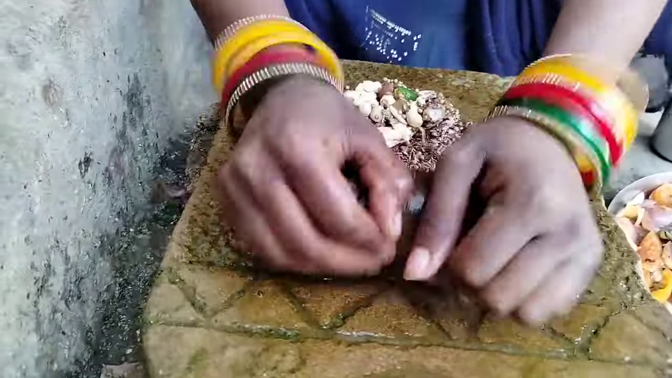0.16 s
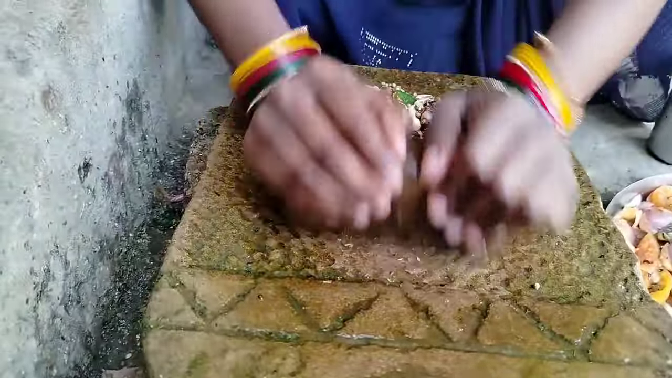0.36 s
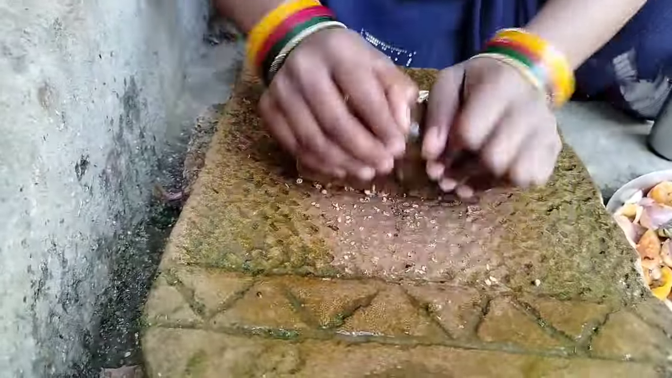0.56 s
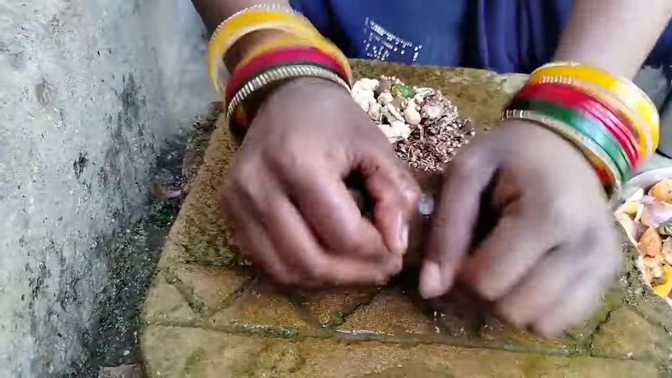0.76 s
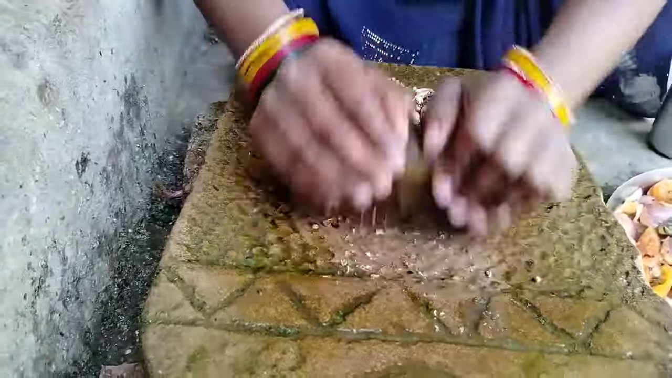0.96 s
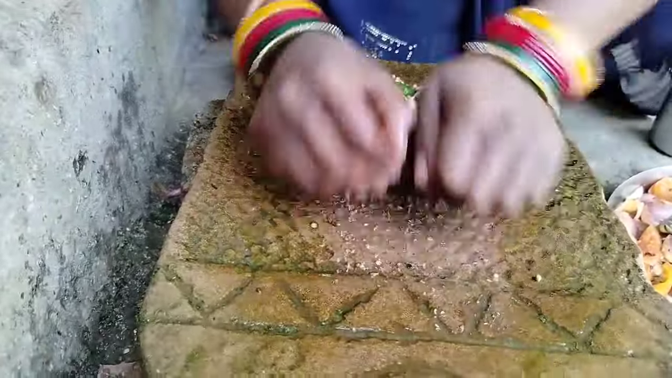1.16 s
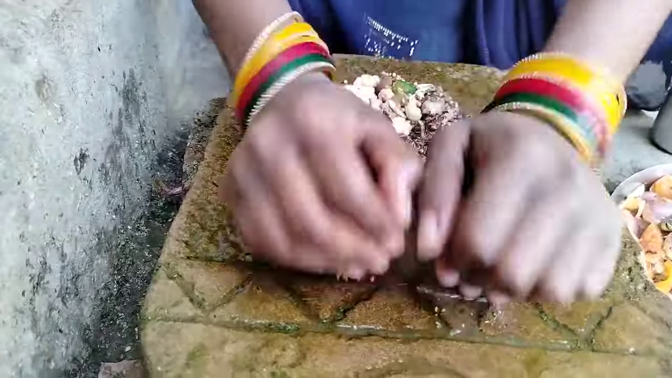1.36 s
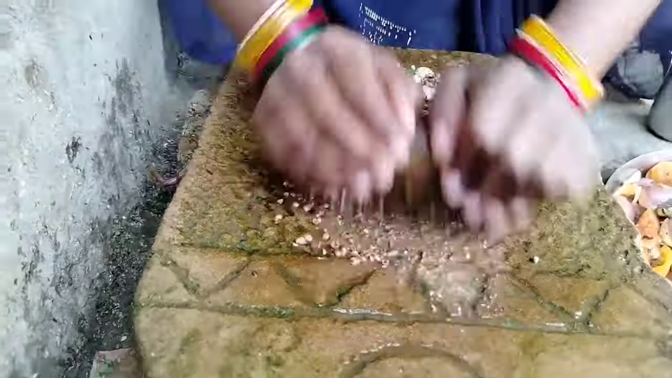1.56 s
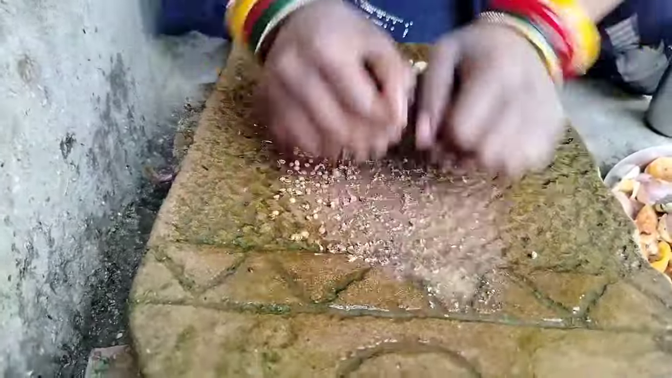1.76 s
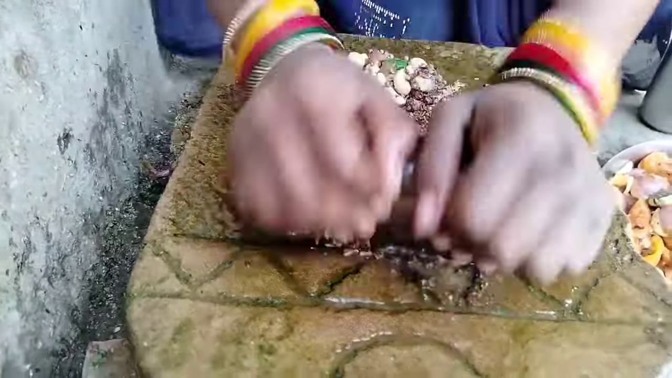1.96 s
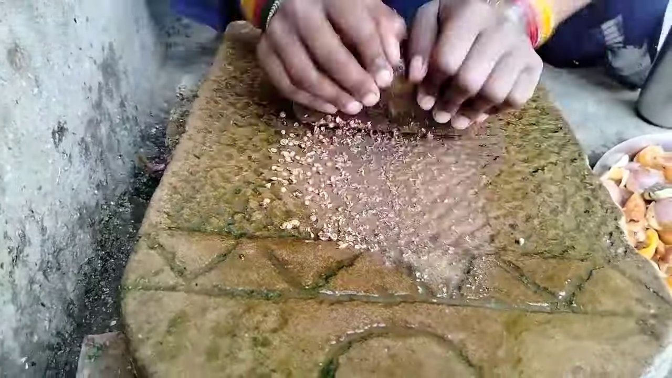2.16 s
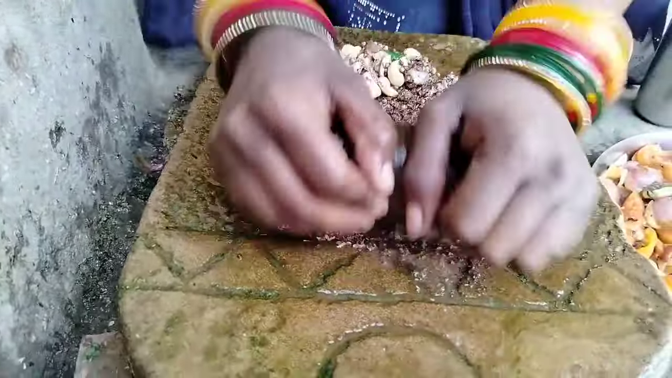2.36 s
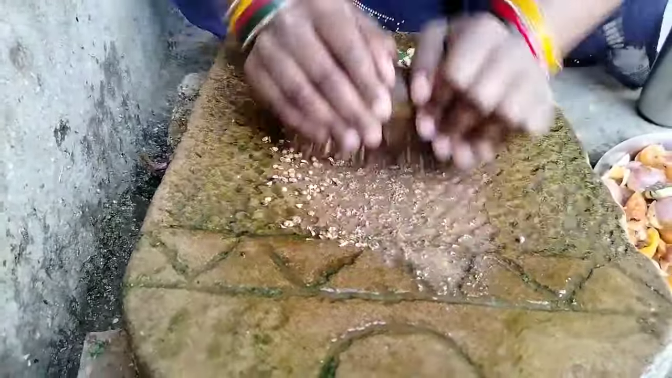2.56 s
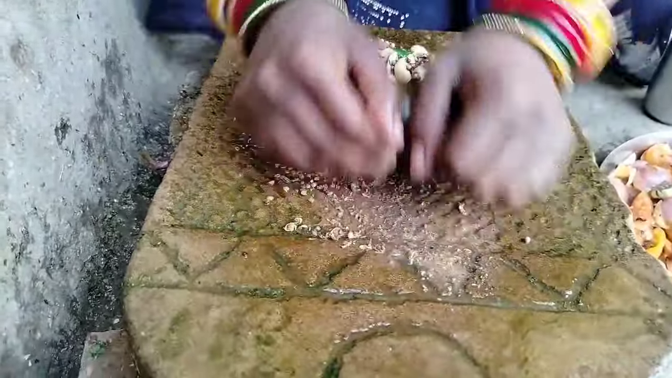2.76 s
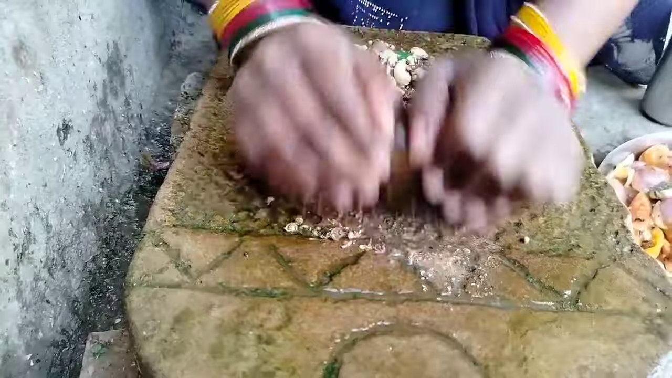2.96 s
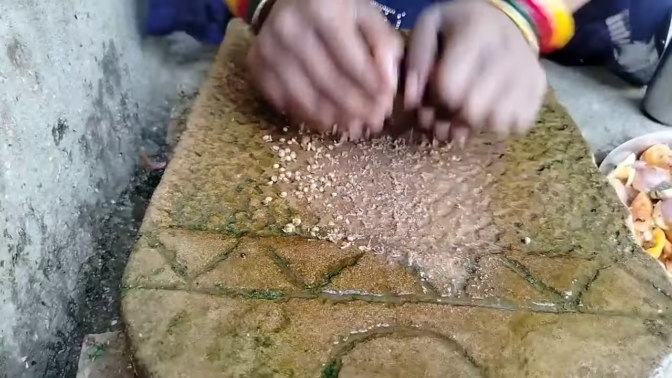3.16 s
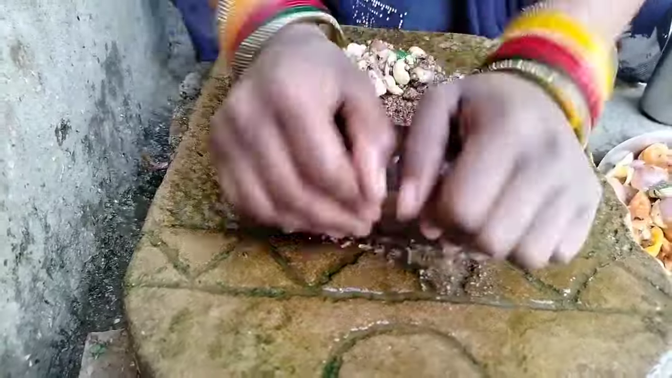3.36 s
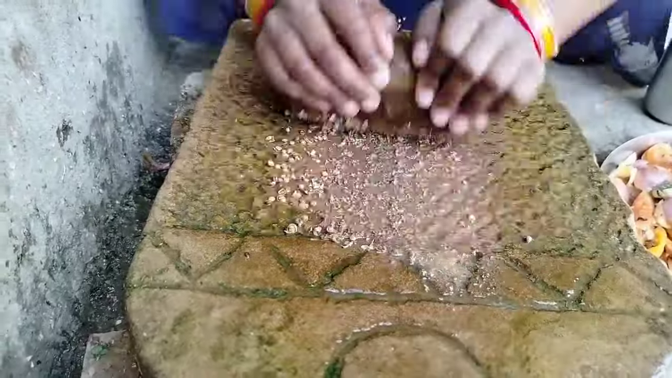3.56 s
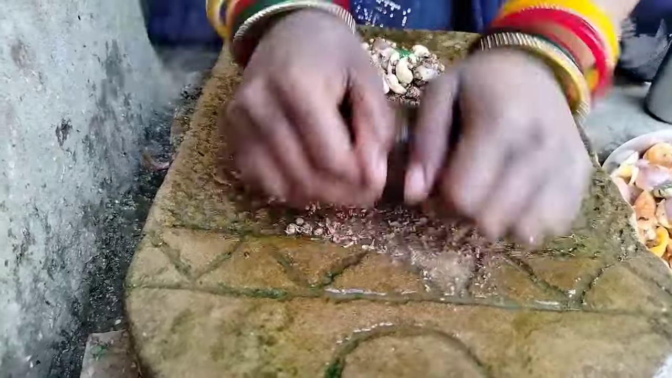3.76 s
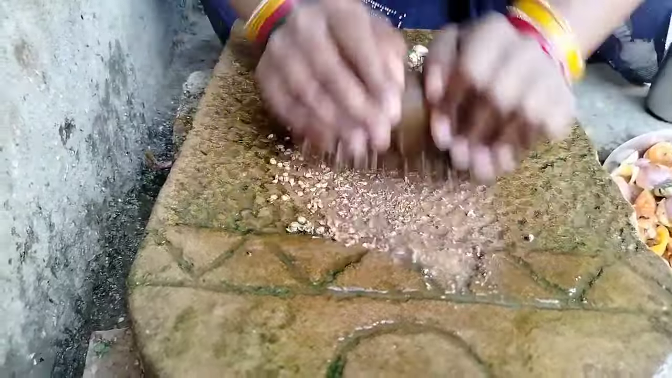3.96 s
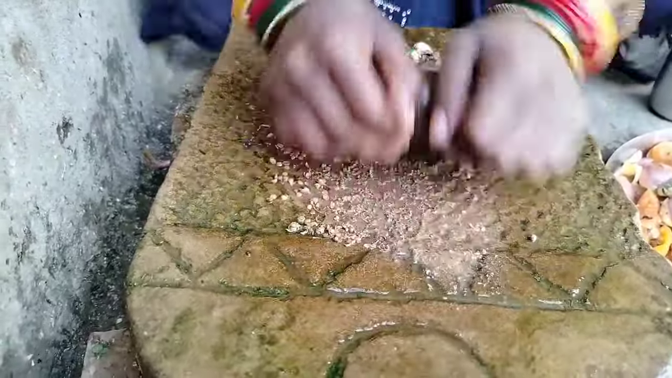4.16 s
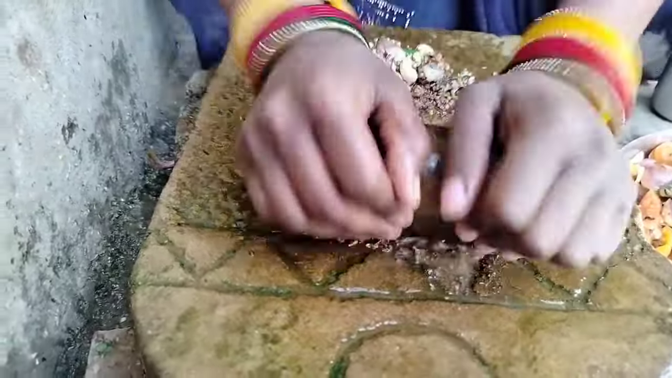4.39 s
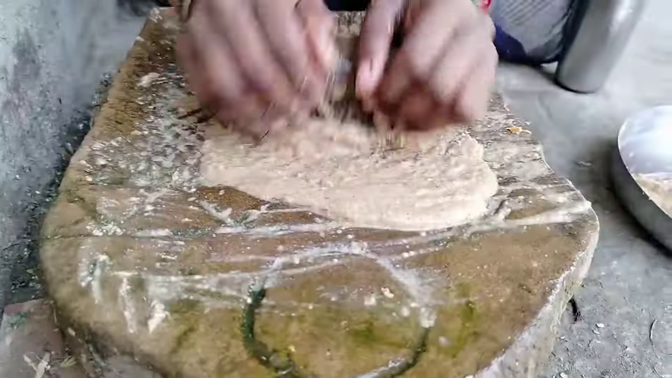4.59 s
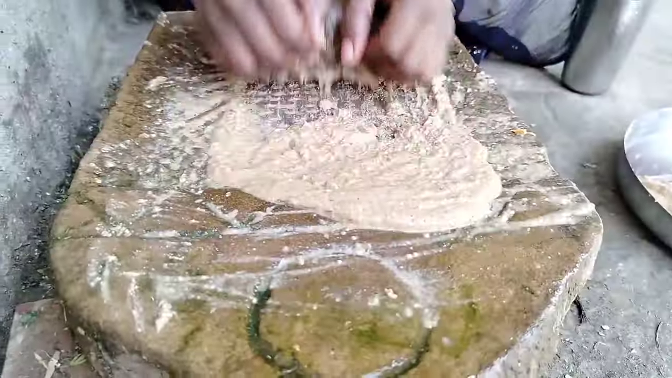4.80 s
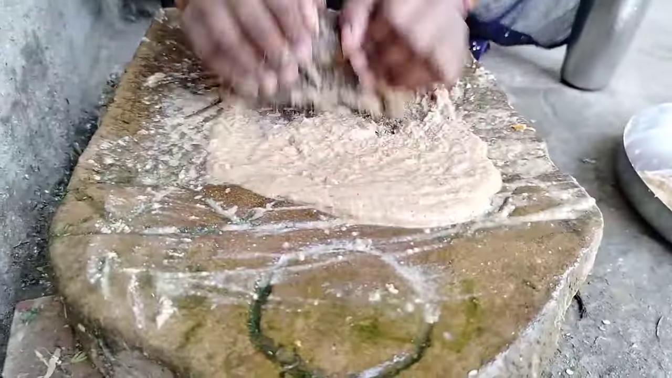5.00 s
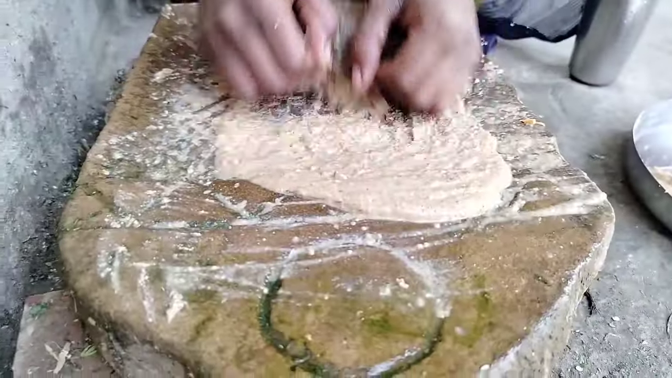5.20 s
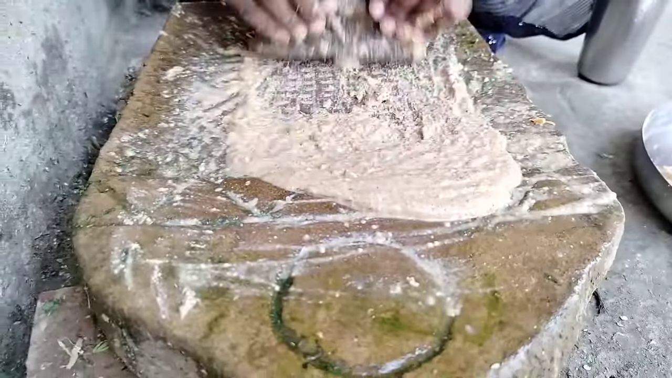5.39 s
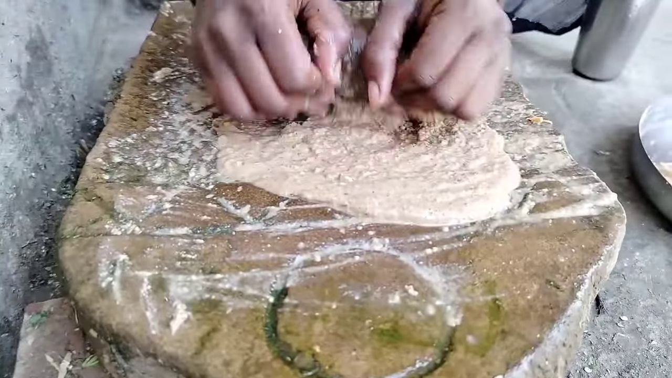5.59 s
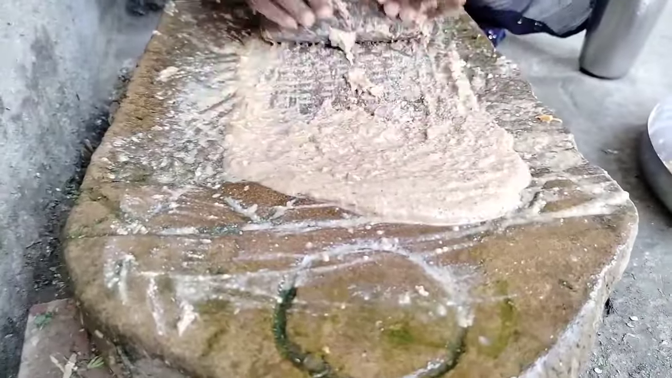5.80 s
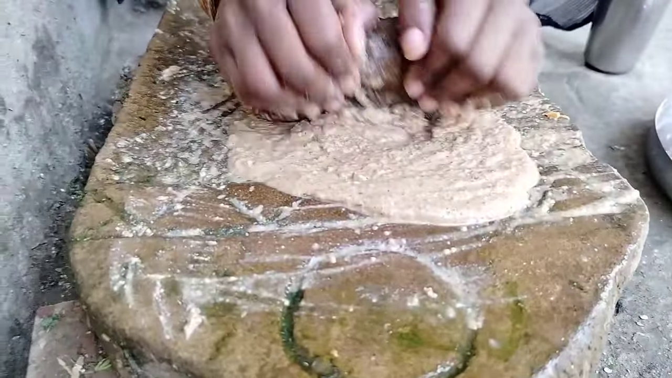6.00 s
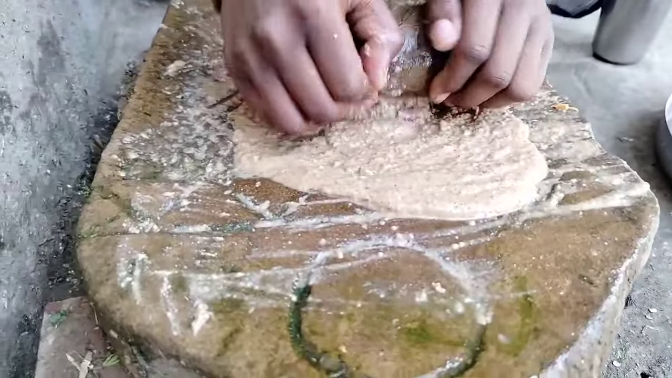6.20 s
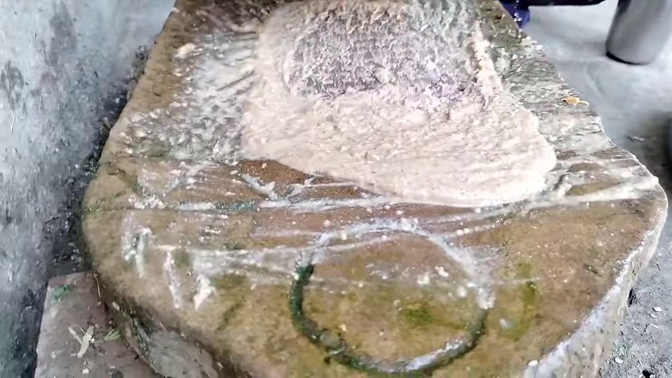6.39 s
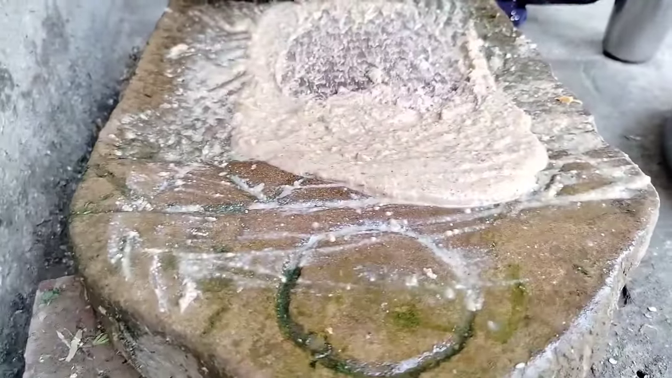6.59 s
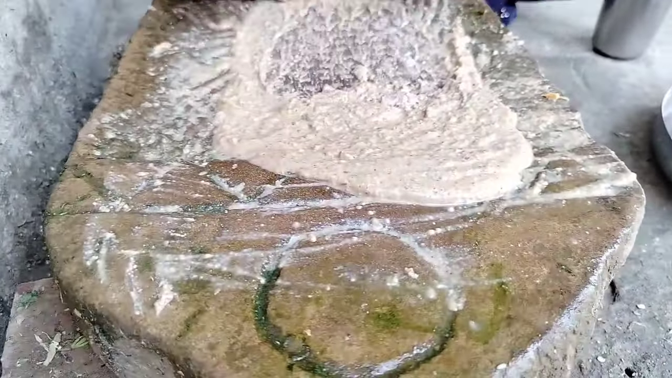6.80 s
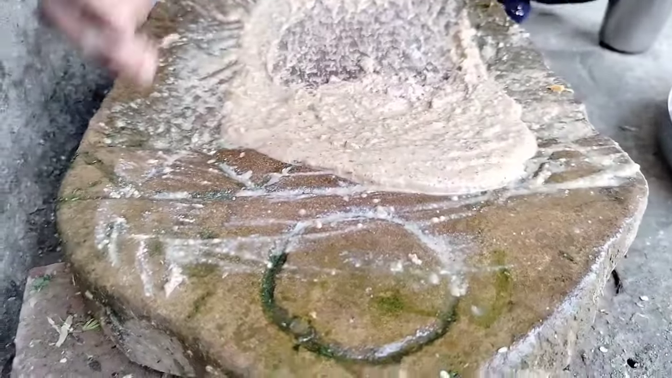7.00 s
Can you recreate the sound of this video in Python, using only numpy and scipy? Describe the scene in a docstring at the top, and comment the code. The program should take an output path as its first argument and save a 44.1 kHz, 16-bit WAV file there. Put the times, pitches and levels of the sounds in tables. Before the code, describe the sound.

Fast, rhythmic dry grinding, heard close in stereo: crisp crunch on each push, lighter scrape on each pull, hard stony knocks and cracking seeds that grow fewer and finer. After a tiny gap of total silence, muted strokes work through thick paste with soft squelches and occasional hollow knocks. A sharp double clack ends the work, leaving a faint slide of hands and quiet room tone with short reflections.

```python
"""In a small kitchen, a hand stone is rubbed to and fro on a stone slab. Quick strokes crunch dry spices:
random grains of noise pass through filters, while seeds burst as short ticks. Struck resonances make the
stone's knocks, and low filtered grit makes it rumble over the pitted slab. Then the sound drops out and the
scene changes: the stone works a wet paste, duller and slower, with small sticky ticks. At last the stone is set
down with a double clack."""
import sys
import numpy as np
from scipy import signal
from scipy.fft import rfft, irfft, next_fast_len
from scipy.io import wavfile
from scipy.ndimage import uniform_filter1d

SR = 44100
rng = np.random.default_rng(int(sys.argv[2]) if len(sys.argv) > 2 else 0)


def put_to_file(sound):
    """Save the sound as 16-bit audio at rate SR, in the file named by the first command-line argument."""
    columns = np.atleast_2d(sound).T  # one column per channel
    safe = np.clip(columns, -1, 1)
    whole_steps = np.round(safe * 32767)
    wavfile.write(sys.argv[1], SR, whole_steps.astype(np.int16))


N = 310792
TIME = np.arange(N) / SR
PAUSE = (4.468, 4.62)  # start and end in seconds of the silence between dry and wet grinding

# The to-and-fro strokes, a hard push then a light pull. Each row: middle of the push in seconds,
# then levels in dB: push crunch, push scrape, push rumble, pull scrape, pull rumble.
CYCLES = [(-.15, -17, -28, -38, -14.5, -35), (0.142, -17.5, -24.5, -36, -26.5, -31.5),
          (0.461, -15, -23.5, -34, -24, -26), (0.776, -13.5, -17.5, -36, -27, -23),
          (1.102, -13, -20.5, -39.5, -31.5, -26.5), (1.427, -12.5, -20, -38.5, -50, -39),
          (1.683, -14.5, -24, -26, -31.5, -28), (2.027, -12, -25, -31, -32, -28.5),
          (2.378, -11, -34, -36, -41.5, -29), (2.711, -12.5, -33, -35.5, -43.5, -32.5),
          (3.065, -15.5, -34.5, -42, -40.5, -31), (3.411, -13.5, -30.5, -38.5, -34.5, -31.5),
          (3.749, -16, -30, -40, -32.5, -28.5), (4.09, -11.5, -34, -31, -30.5, -30.5),
          (4.44, -16, -27, -36.5, -40, -40)]
# The tone colour of smearing. Each row: frequency in Hz, relative level in dB per Hz.
SMEAR_SPECTRUM = [(1500, -6), (2400, -2.5), (3400, -2.5), (4400, -0.5), (5500, -2), (7400, 0), (9200, -13),
                  (13500, -9)]


def undb(db):
    """Turn decibels into a gain."""
    return 10 ** (np.asarray(db) / 20)


def unit(x):
    """Scale to an average (rms) level of 1."""
    return x / np.sqrt(np.mean(x ** 2))


def colour(x, points):
    """Shape a sound by a spectrum of (Hz, dB) points and scale it to rms 1."""
    hz, db = np.transpose(points)
    size = next_fast_len(N)
    f = np.maximum(np.fft.rfftfreq(size, 1 / SR), 1)
    gain = undb(np.interp(np.log(f), np.log(hz), db))
    # fall away below the first point and above the last
    gain = gain * np.minimum(f / hz[0], 1) ** 2 * np.minimum(hz[-1] / f, 1) ** 2
    return unit(irfft(rfft(x, size) * gain, size)[..., :N])


def band(x, lo_hz, hi_hz, order=2):
    """Keep only the frequencies between two limits."""
    edges = [lo_hz, min(hi_hz, SR / 2 - 1)]
    return signal.sosfilt(signal.butter(order, edges, "band", fs=SR, output="sos"), x)


def fade(t, t60):
    """Die away by 60 dB in t60 seconds."""
    return np.exp(-np.log(1000) * t / t60)


def add(out, s, sound):
    """Mix a sound in at time s."""
    i = int(np.clip(s * SR, 0, N - 1))
    out[:, i:i + sound.shape[-1]] += sound[:, :N - i]


def swell(start, attack, hold, release):
    """A smooth rise, hold and fall, with times in seconds."""
    corners = start + np.cumsum(np.abs([0, attack, hold, release]))
    return np.sin(np.pi / 2 * np.interp(TIME, corners, [0, 1, 1, 0])) ** 2


def grit(rate, spread_db):
    """Tiny random fractures, about `rate` a second, with randomly spread strengths."""
    chance = rng.random(N)
    size = np.clip(rng.standard_normal(N), -2, 2)
    return unit((chance < rate / SR) * undb(spread_db * size) * rng.choice([-1, 1], N))


def flutter(rate, depth_db):
    """Uneven grip: a gain that wanders, with `rate` new random values a second."""
    values = np.clip(rng.standard_normal(N), -2, 1.5)
    return undb(depth_db * np.interp(TIME * rate, np.arange(N), values))


def pan(x, left_db):
    """Tip the balance to the left."""
    return x * undb(np.array([[left_db], [-left_db]]) / 2)


def ports(x, lead_s):
    """Two microphone ports; the left one hears the slab a little earlier."""
    return np.array([x, np.roll(x, int(round(lead_s * SR)))])


def rub(spectrum, rate, spread_db, apart, lead_s):
    """Grit heard through a spectrum; a share of it reaches each port by a separate path."""
    own = np.array([grit(rate, spread_db) for _ in range(2)])
    shared = ports(grit(rate, spread_db), lead_s)
    return colour(shared + apart * own, spectrum)


def sweep(hz, width_hz):
    """Grit ringing in a resonance whose centre can move."""
    low_pass = signal.butter(2, width_hz / 2, fs=SR, output="sos")
    slow = signal.sosfilt(low_pass, grit(1500, 9) + 1j * grit(1500, 7.3))
    # shift the slow wobble up to the resonance
    return unit((slow * np.exp(2j * np.pi * np.cumsum(hz) / SR)).real)


def flurries(pitches, width_hz, rate, flurry_rate, depth_db, apart, lead_s):
    """Small snaps, each size at its own pitch; every size comes and goes on its own."""
    out = np.zeros((2, N))
    for hz in pitches:
        # each pitch leaves the stone in its own direction, so part reaches each port by a separate path
        shared = ports(grit(rate, 1.6), lead_s)
        own = np.array([grit(rate, 3.9) for _ in range(2)])
        out += band(shared + apart * own, hz, hz + width_hz) * flutter(flurry_rate, depth_db)
    return unit(out)


def blows(rows, contact_t60, contact_db, ring, snap_db, chatter_db, chatter_s, gain_db):
    """Each blow rings the contact and the stones' natural tones; a hard one brings out the upper tones."""
    # The natural tones of the two stones. Each row: frequency in Hz,
    # 60 dB decay in seconds before `ring` scales it, base level in dB.
    stone_modes = [(400.7, 0.15, -17), (435, 0.013, -17.5), (631, 0.056, -12), (755, 0.03, -16.5),
                   (753, 0.06, -17), (1004, 0.0077, -12.5), (1020, 0.077, -8), (1147, 0.029, -7),
                   (1379, 0.037, -9.5), (1750, 0.013, -25.5), (1810, 0.019, -9.5), (2094, 0.04, -10),
                   (2200, 0.011, -5), (2487, 0.064, -9.5), (3410, 0.022, -24)]
    out = np.zeros((2, N))
    t = np.arange(SR // 8) / SR
    hz, t60, db = np.transpose(stone_modes)
    upper = np.clip(np.log2(hz / 1100), 0, 1)
    decay = fade(t, np.append(t60 * ring, contact_t60)[:, None])
    around = np.arange(-SR // 100, SR // 50) / SR  # seconds before and after the blow
    for s, peak_db, contact_hz, hard_db in rows:
        # the place of contact weights and detunes the modes anew
        place, detune, skew = rng.standard_normal((3, len(hz) + 1))
        f = np.append(hz, contact_hz) * (1 + .025 * detune)
        mode_db = np.append(db + upper * (hard_db + 6.5), contact_db) + 3.3 * place
        gain = undb(mode_db) * rng.choice([-1, 1], len(f))
        waves = gain[:, None] * decay * np.exp(2j * np.pi * f[:, None] * t)
        lag = f / 1000 * (.5 + 0.42 * skew)  # radians by which the right port trails
        left = waves.sum(axis=0).imag
        right = (waves * np.exp(-1j * lag)[:, None]).sum(axis=0).imag
        # grit gives way just before the blow and chatters on after it
        force = rng.standard_normal(len(around)) * np.exp(-np.maximum(around, -2 * around) / chatter_s)
        force = undb(chatter_db) * force / np.linalg.norm(force) + (around == 0)
        hit = band(signal.fftconvolve(np.array([left, right]), force[None], axes=1), 320, 2500)
        # scale by the strongest short-term level
        hit = hit / np.sqrt(2 * uniform_filter1d(np.mean(hit ** 2, axis=0), size=88).max())
        add(out, s + around[0], hit * undb(peak_db + gain_db))
        snap = rng.standard_normal((2, len(t))) * fade(t, .012)
        add(out, s, snap * undb(peak_db + snap_db + hard_db))
    return pan(out, left_db=2.5)


def snaps(rows, t60, width, gain_db):
    """A small burst: decaying noise near its own pitch, with a faint tick at 4800 to 5800 Hz."""
    out = np.zeros((2, N))
    t = np.arange(SR // 25) / SR
    for s, peak_db, hz in rows:
        burst = rng.standard_normal((3, len(t))) * fade(t, t60)
        burst = burst[:2] + burst[2]  # part separate, part shared by both sides
        tick = band(burst, hz / (1 + width), hz * (1 + width), order=1) + 0.11 * band(burst, 4800, 5800)
        add(out, s, tick / np.abs(tick).max() * undb(peak_db + gain_db))
    return out


def hums(rows):
    """Soft steady or gliding tones that swell and fade."""
    out = np.zeros((2, N))
    for s, length, first_hz, last_hz, db in rows:
        u = np.linspace(0, 1, int(length * SR))
        hz = first_hz + (last_hz - first_hz) * u
        tone = np.sin(2 * np.pi * np.cumsum(hz) / SR) * np.sin(np.pi * u)
        add(out, s, undb(db) * np.array([tone, tone]))
    return out


def kitchen(x, early_db, early_t60, late_db, late_t60):
    """Quick echoes from the floor and near wall, then a faint tail, made by decaying noise."""
    t = np.arange(SR // 2) / SR
    noise = rng.standard_normal((3, len(t)))
    # long waves reach both ports alike
    field = band(noise[2], 430, 800, order=1) + band(noise[:2], 730, 14000, order=1)
    early, late = (fade(t, t60) * (t > .003) for t60 in (early_t60, late_t60))
    early = undb(early_db) * early / np.linalg.norm(early)
    late = undb(late_db) * late / np.linalg.norm(late)
    return x + signal.fftconvolve(x, field * (early + late), axes=1)[:, :N]


def room_tone():
    """The quiet room: steady noise, partly shared by both sides."""
    # The tone colour of the room. Each row: frequency in Hz, relative level in dB per Hz.
    room_spectrum = [(18, -43.5), (30, -31.5), (95, -3), (177, -22), (212, -10), (241, -23.5), (310, -19.5),
                     (624, -23.5), (1220, -34), (4750, -39), (14000, -55.5)]
    air = rng.standard_normal((3, N))
    return colour(air[2] + .5 * air[:2], room_spectrum) * undb(-56)


def arm_motion():
    """Push and pull in turn; gives the strength of crunch, scrape and rumble, and the stone's place."""
    # How each sound swells in a push, in seconds: lead before the middle, attack, hold, release.
    push_crunch = (0.067, 0.055, 0.019, 0.074)
    push_scrape = (0.069, 0.068, 0.048, 0.048)
    push_rumble = (.075, 0.09, .05, 0.024)
    # How each sound swells in a pull, as shares of its length: attack, hold, release.
    pull_shapes = ((0.11, 0.52, 0.34), (0.18, 0.095, 0.5), (0.37, 0.22, 0.39))  # crunch, scrape, rumble
    # Ever fewer coarse bits are left to catch on the way back. Each row: time in seconds, level in dB.
    pull_crunch_levels = [(0, -29), (2.7, -27.5), (4.4, -49)]
    # the pull starts this long after the middle of one push and ends this long before the next
    after_s, before_s = .1, .045
    rest_db = -56  # scrape and rumble while the stone turns round

    crunch, scrape, rumble, travel = np.zeros((4, N))
    gaps = np.diff([row[0] for row in CYCLES])
    for row, gap in zip(CYCLES, np.append(gaps, gaps[-1])):
        s, crunch_db, scrape_db, rumble_db, pull_scrape_db, pull_rumble_db = row
        push = [swell(s - lead, *shape) for lead, *shape in (push_crunch, push_scrape, push_rumble)]
        length = gap - after_s - before_s
        pull = [swell(s + after_s, *length * np.array(shape)) for shape in pull_shapes]
        pull_crunch_db = np.interp(s, *np.transpose(pull_crunch_levels))
        crunch += push[0] * undb(crunch_db) + pull[0] * undb(pull_crunch_db)
        scrape += push[1] * undb(scrape_db) + pull[1] * undb(pull_scrape_db)
        rumble += push[2] * undb(rumble_db) + pull[2] * undb(pull_rumble_db)
        travel += swell(s - before_s, before_s + after_s, 0, length)  # 0 drawn back, 1 pushed out
    motion = np.array([crunch, scrape + undb(rest_db), rumble + undb(rest_db), travel])
    return motion * (TIME < PAUSE[0])


def dry_strokes(crush, scrape, travel):
    """Each stroke drives both the crushing of spice and the scrape of stone."""
    # Tone colours of crushing and of scraping. Each row: frequency in Hz, relative level in dB per Hz.
    crunch_spectrum = [(300, -16), (1500, -21), (2400, -12.5), (2950, -14.5), (3500, -2), (4300, -2.5),
                       (5200, -3.5), (6100, 2.5), (7400, 5), (8300, -1.5), (9200, -15), (11000, -6),
                       (13000, -5.5), (14500, -15.5)]
    scrape_spectrum = [(250, -39), (400, -4.5), (510, -10), (680, 1.5), (860, -7), (1020, 7), (1250, -3),
                       (1650, -11.5), (1900, -20.5), (2100, 2.5), (2300, -13), (2500, 1.5), (2800, -30.5),
                       (4500, -30.5)]
    pitches = np.geomspace(1500, 13400, num=23)
    chips = flurries(pitches, width_hz=723, rate=1000, flurry_rate=42, depth_db=9.5, apart=1.0, lead_s=.00023)
    dust = np.array([grit(7000, 2.3) for _ in range(2)])
    crunch = colour(chips + 0.67 * dust, crunch_spectrum) * flutter(rate=140, depth_db=3.5)
    # the sharpest snaps soften as the spice turns to powder
    edge = signal.sosfiltfilt(signal.butter(2, 9000, "high", fs=SR, output="sos"), crunch)
    edge_gain = undb(np.interp(TIME, [0, PAUSE[0]], [3, -6]))
    crunch = crunch + edge * (edge_gain - 1)
    # a faint crunch stays between the strokes
    crunch = crunch * np.hypot(crush, undb(-37.5) * (TIME < PAUSE[0]))

    stone = rub(scrape_spectrum, rate=800, spread_db=9.5, apart=0.29, lead_s=.00009)
    stone = stone * flutter(rate=80, depth_db=4.5)
    # the contact resonance sinks as the stone is pushed out along the slab
    contact_hz = np.interp(travel, [0, 1], [1220, 700])
    contact = ports(sweep(contact_hz, width_hz=540), lead_s=.00007)
    stone = stone * undb(-4.5) + contact * undb(-6.0)
    return pan(crunch, left_db=0.8) + pan(stone * scrape, left_db=1.5)


def rolling(roll):
    """The heavy stone bumps over the pitted slab, in near-regular jolts over a broad rumble."""
    # The tone colour of the rumble. Each row: frequency in Hz, relative level in dB per Hz.
    rumble_spectrum = [(30, -42.5), (60, -28), (90, -2), (125, 1), (165, -4.5), (200, 0.5), (235, -0.5),
                       (290, -21), (390, -2.5), (520, -27), (900, -42.5)]
    rumble = rub(rumble_spectrum, rate=900, spread_db=5.5, apart=0.057, lead_s=0)
    jolts = sweep(145 * flutter(rate=9, depth_db=1.2), width_hz=35)
    return roll * (rumble * undb(-4.5) + jolts * undb(-4.0))


def with_rebounds(rows):
    """After a knock the stone may drop back on the slab, unevenly and weaker each time."""
    gap_s, loss_db = .0145, 2.5  # average gap before it is varied, and loss at each rebound
    hits = []
    for row, chance in zip(rows, rng.uniform(-0.7, 1, (len(rows), 8))):
        s, peak_db, hz, hard_db, rebounds = row
        for k in range(int(round(rebounds)) + 1):
            hits.append((s, peak_db - k * loss_db, hz, hard_db))
            s += gap_s * (1 + 0.17 * chance[k])
    return hits


def stone_knocks():
    """Stone meets stone; the palms damp the hand stone, so the contact rings only briefly."""
    # Each row: time in seconds, relative peak level in dB, contact ring in Hz before a small random detune,
    # hardness in dB, number of rebounds.
    knock_rows = [(.0097, 1, 907, 3, 0), (.1451, 1.5, 1230, 1.5, 0), (.1868, 2.5, 930, -1.5, 1),
                  (.2715, 0, 1093, 7.5, 0), (.2784, 2.5, 1035, -16, 3), (.4945, -6, 900, -8.5, 1),
                  (.6032, -1, 964, -11.5, 0), (.6217, -5.5, 1030, -15.5, 0), (.761, -5.5, 1151, -5, 0),
                  (.826, 0, 894, 0, 0), (.9151, -1.5, 1035, -1, 1), (.9565, -2, 1060, -7, 0),
                  (1.1392, -9.5, 1040, -30, 0), (1.2407, -6.5, 1134, -1, 1), (1.3777, -11, 1180, -3, 0),
                  (1.4002, -10, 1150, -5, 0), (1.4766, -3.5, 986, -14, 0), (1.5551, -3.5, 1043, -4.5, 1),
                  (1.7163, -9, 690, -13, 1), (1.8183, -14, 1020, -10, 0), (2.0288, -4.5, 1167, -3, 1),
                  (2.0958, -15.5, 940, -17, 0), (2.4093, -6.5, 1070, -21, 0),
                  (2.4402, -6.5, 1025, -21.5, 0), (2.5373, -8.5, 1100, -7.5, 1),
                  (2.7172, -9.5, 1200, -44.5, 0), (2.761, -16, 940, -22, 0), (2.8765, -13.5, 1100, -0.5, 0),
                  (3.0835, -12, 1092, -45, 0), (3.1983, -8, 1057, -14, 0), (3.8057, -6.5, 830, -13, 0),
                  (3.8851, -14.5, 1050, -28.5, 0), (4.2198, -7, 1039, 2.5, 0), (4.2503, -6, 1020, -8, 0),
                  (4.4309, -3.5, 1070, -8, 0), (4.836, -24.5, 1004, -18, 0), (5.1169, -11, 1035, -25, 0),
                  (5.3187, -14, 905, -29, 0), (5.3297, -7.5, 980, -7.5, 1), (5.3638, -2, 867, 2, 0),
                  (5.527, -18.5, 925, -16, 0), (5.75, -19.5, 1030, -12, 0), (5.8222, -12.5, 1004, -12.5, 0),
                  (5.964, -18, 1000, -40, 0)]
    return blows(with_rebounds(knock_rows), contact_t60=.026, contact_db=2.5, ring=0.94, snap_db=-40.5,
                 chatter_db=-2.5, chatter_s=0.0059, gain_db=-1.0)


def small_seeds():
    """Each pull catches a couple of loose seeds, which burst more weakly as the spice gets finer."""
    # seconds after the middle of a push: as the stone bites in again, and halfway back
    after_push = (.117, .215)
    spots = np.add.outer([row[0] for row in CYCLES[1:-1]], after_push).ravel()
    late, size, pitch = rng.uniform(-0.82, 1, (len(spots), 3)).T
    level_db = -10.5 - 3 * spots + 2.5 * size  # fades by 3 dB a second
    return zip(spots + 0.0034 * late, level_db, 7500 - 3200 * pitch ** 2)


def bursting_seeds():
    """Seeds crack under the stone, each a brief burst of noise near its own pitch."""
    # The loudest seeds. Each row: time in seconds, relative peak level in dB, pitch in Hz.
    loud_seeds = [(.092, -12, 7400), (.324, -15, 7700), (.78, -0.5, 6100), (1.377, -9.5, 7100),
                  (1.527, -6, 7340), (1.546, -6, 4220), (1.627, -10, 4417), (1.647, -2, 5618),
                  (1.788, -6, 4290), (1.866, -6.5, 7500), (1.986, -6, 7315), (2.35, -2.5, 6210)]
    return snaps([*loud_seeds, *small_seeds()], t60=0.036, width=0.057, gain_db=1.0)


def faint_tones():
    """Faint squeaks and soft steady tones, made from sine waves."""
    # Each row: start in seconds, length in seconds, first pitch in Hz, last pitch in Hz, level in dB.
    tone_rows = [(.48, .095, 2620, 2230, -37), (.675, .06, 2450, 2310, -38), (6.87, .26, 528, 528, -51)]
    return hums(tone_rows)


def wet_strokes():
    """Paste damps the grit: the stones drone, and the paste squelches softly between them."""
    # Strokes through the paste. Each row: start, full speed, easing and end, all in seconds,
    # then relative levels in dB: stone scrape, slab drone, wet smear.
    paste_rows = [(4.6, 4.645, 4.66, 4.78, -47, -60, -55), (4.829, 4.842, 4.915, 4.965, -24, -27, -44),
                  (4.99, 5.085, 5.12, 5.21, -23, -39, -39), (5.265, 5.325, 5.35, 5.435, -21, -22, -47),
                  (5.46, 5.53, 5.555, 5.68, -31, -42, -43), (5.73, 5.8, 5.84, 5.895, -24, -23, -52),
                  (5.945, 5.968, 6.005, 6.15, -26, -47, -42), (6.235, 6.28, 6.315, 6.365, -47, -46, -70)]
    # The stone's scrape where paste coats it. Each row: frequency in Hz, relative level in dB per Hz.
    wet_scrape_spectrum = [(250, -32), (400, -7.5), (560, -6), (700, -1.5), (830, -5), (1010, 2),
                           (1300, -7), (1750, -21.5), (2080, -4), (2280, -14), (2490, 2), (2800, -28.5),
                           (3300, -38.5), (4500, -16.5), (6500, -62)]
    speed = np.array([np.interp(TIME, np.sort(row[:4]), [0, 1, 1, 0]) ** 2 for row in paste_rows])
    scrape, drone, smear = undb(np.array(paste_rows)[:, 4:]).T @ speed

    # the contact resonance wanders as the stone rides over lumps
    contact_hz = 1000 * flutter(rate=14, depth_db=-0.32)
    contact = ports(sweep(contact_hz, width_hz=127), lead_s=.00007)
    grinding = rub(wet_scrape_spectrum, rate=1100, spread_db=12.5, apart=1.0, lead_s=.00007)
    stone = scrape * (grinding * undb(-6) + contact * undb(-2))
    slab = drone * sweep(np.full(N, 400), width_hz=70) * undb(0.5)

    # the rumble builds late in each stroke, 0.015 s behind the drone
    late_drone = np.interp(TIME - 0.015, TIME, drone)
    low_spectrum = [(30, -39), (70, -8.5), (115, 0), (170, -5.5), (260, -13), (500, -20)]  # (Hz, dB per Hz)
    rumble = rub(low_spectrum, rate=1800, spread_db=-3.0, apart=0.04, lead_s=0)
    low = late_drone * rumble * undb(-4.5)

    pitches = np.geomspace(1400, 13000, num=16)
    squelch = flurries(pitches, width_hz=540, rate=310, flurry_rate=32, depth_db=12.5, apart=1.0, lead_s=.00014)
    wet = smear * colour(squelch + 0.25 * grit(1900, 2.1), SMEAR_SPECTRUM) * undb(6.0)
    return pan(stone + slab + low + wet, left_db=2.5)


def sticky_ticks():
    """Paste sticks and lets go with small bursts of noise."""
    # Each row: time in seconds, relative peak level in dB, pitch in Hz.
    smack_rows = [(4.8126, -20.5, 7500), (5.14, -19, 6540), (5.2157, -19, 7340), (5.4616, -26.5, 7000),
                  (5.6622, -23, 7850), (5.8996, -24, 7330), (5.965, -16.5, 7080), (6.34, -36, 7550),
                  (6.371, -25, 7300), (6.952, -32, 4600)]
    return snaps(smack_rows, t60=0.015, width=0.07, gain_db=-2)


def rocking_stone():
    """The stone rocks on the slab with a low hum, and the slab gives a low thump as the stone is set down; both
    made from sine waves."""
    # Each row: start in seconds, length in seconds, first pitch in Hz, last pitch in Hz, level in dB.
    rocking_rows = [(4.9, 0.1, 130, 69.6, -36), (5.15, 0.062, 145, 119, -36.5),
                    (5.605, 0.056, 139, 161, -33.5), (6.17, 0.098, 119, 72, -41.5),
                    (6.59, 0.14, 118.7, 68.1, -39), (6.715, 0.05, 114, 99, -26)]
    return hums(rocking_rows)


def setting_down():
    """The stone is set down with a double clack and let go; the blows ring briefly."""
    # Each row: time in seconds, relative peak level in dB, contact ring in Hz before a small random detune,
    # hardness in dB.
    set_down_rows = [(6.7183, -2, 1050, 10.5), (6.7305, -7, 960, -33), (7.026, -35.5, 1710, 2)]
    clack = blows(set_down_rows, contact_t60=0.02, contact_db=-7.5, ring=0.3, snap_db=-37,
                  chatter_db=-19.0, chatter_s=0.017, gain_db=5.5)
    # set down at the edge of the slab, it carries further into the room
    return kitchen(clack, early_db=-11.0, early_t60=0.1, late_db=-24.5, late_t60=0.31)


def letting_go():
    """The stone grates briefly as it settles, and the hands slide off it."""
    grate_spectrum = [(1500, -35), (2050, 12), (2600, -0.5), (3200, -3.5), (3800, -29)]  # (Hz, dB per Hz)
    grate = rub(grate_spectrum, rate=4600, spread_db=2, apart=1.0, lead_s=0)
    settle_s = [6.735, 6.775, 6.815, 6.845, 6.9, 7.04]
    settle_db = [-32, -33, -45.5, -42, -64.0, -67.0]
    settle = undb(np.interp(TIME, settle_s, settle_db)) * (TIME > 6.73)
    slide = np.interp(TIME, [6.72, 6.78, 6.88, 7.04], [0.19, 1.1, 0.084, 0.84])
    hands = rub(SMEAR_SPECTRUM, rate=4000, spread_db=7.5, apart=1, lead_s=0) * slide
    return grate * settle + hands * undb(-53.5)


def scene():
    """All the work on the slab, in the room."""
    crush, scrape, roll, travel = arm_motion()
    work = dry_strokes(crush, scrape, travel) + rolling(roll) + stone_knocks() + bursting_seeds()
    work = work + wet_strokes() + sticky_ticks() + rocking_stone() + setting_down()
    in_room = kitchen(work, early_db=-9.5, early_t60=0.13, late_db=-39.5, late_t60=.29)
    return in_room + room_tone() + faint_tones() + letting_go()


def record(dry):
    """The microphone flattens the hardest knocks and cuts the top; the sound drops out in the pause."""
    outside_pause = (TIME < PAUSE[0]) | (TIME > PAUSE[1])
    heard = uniform_filter1d(1. * outside_pause, size=200)  # soften the edges of the pause
    limited = dry / (1 + dry ** 6) ** (1 / 6)
    top_cut = signal.ellip(8, .2, 70, 14500, fs=SR, output="sos")  # low-pass at 14500 Hz
    return signal.sosfilt(top_cut, limited * heard)


dry = scene()
out = record(dry)
put_to_file(out)
```